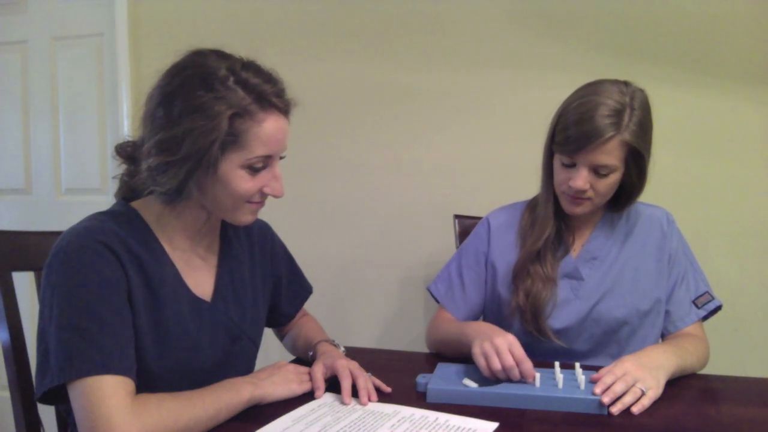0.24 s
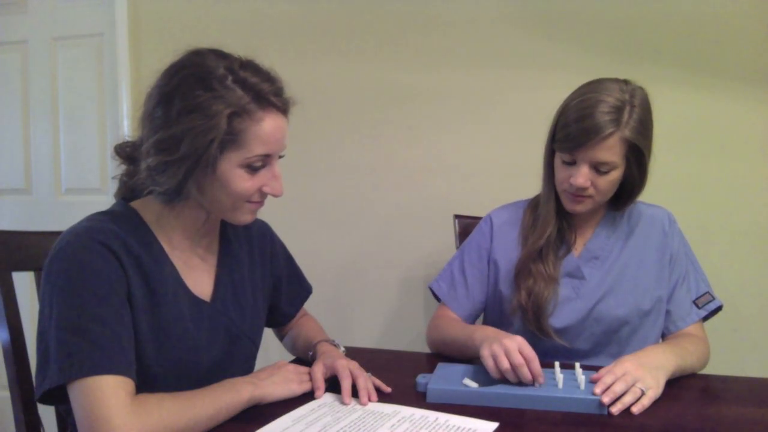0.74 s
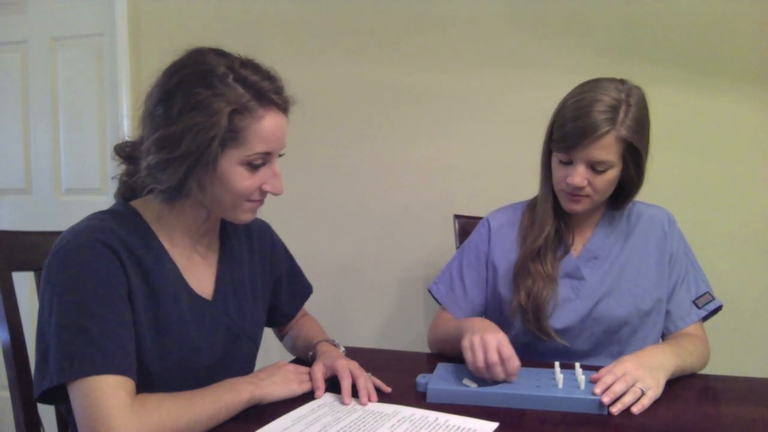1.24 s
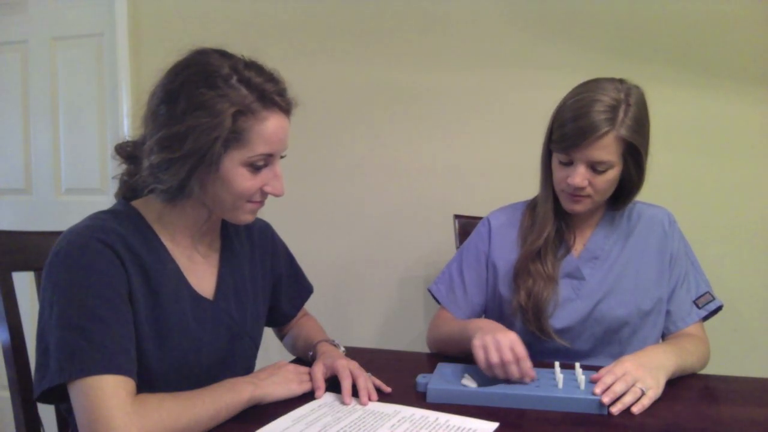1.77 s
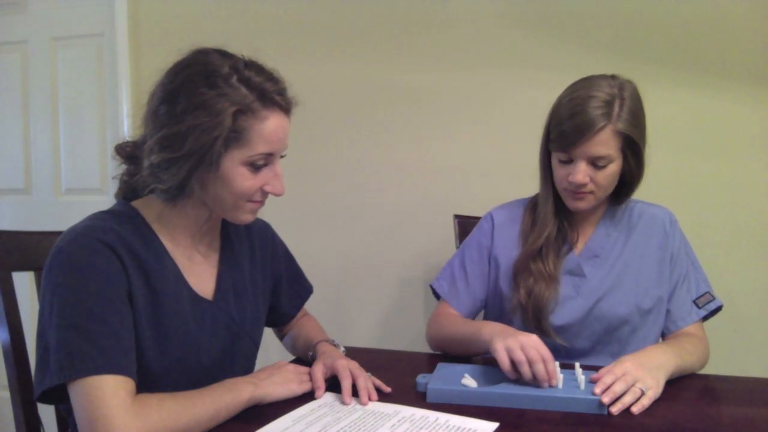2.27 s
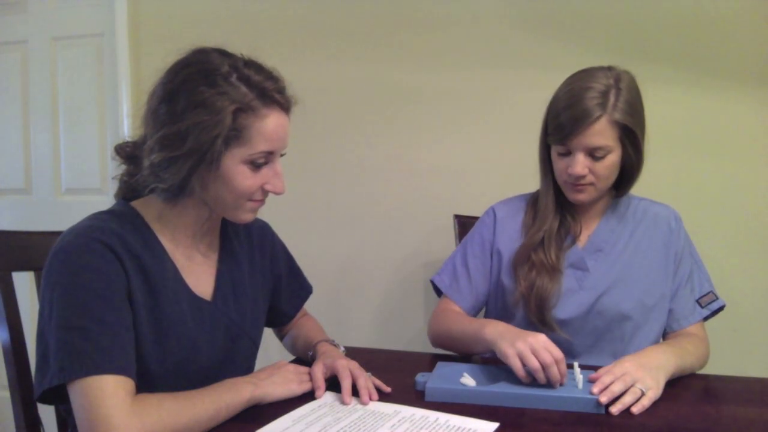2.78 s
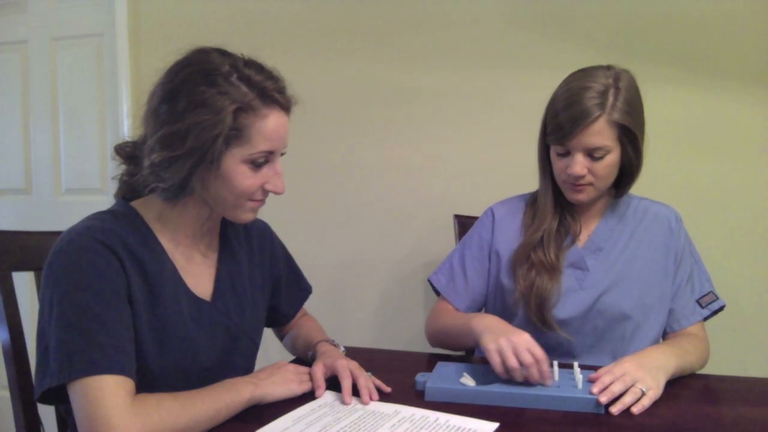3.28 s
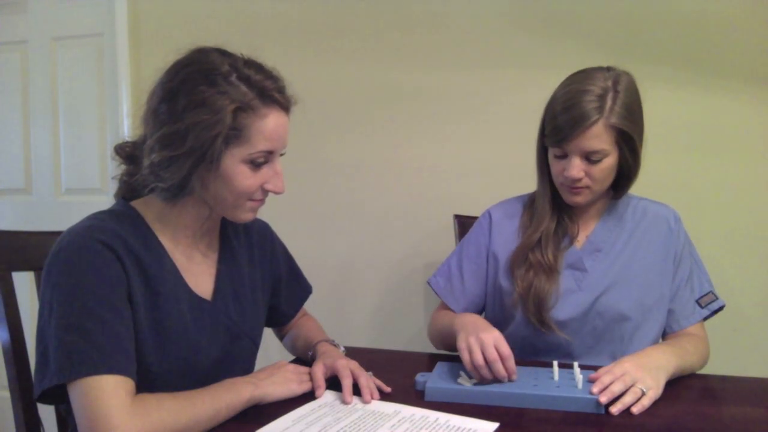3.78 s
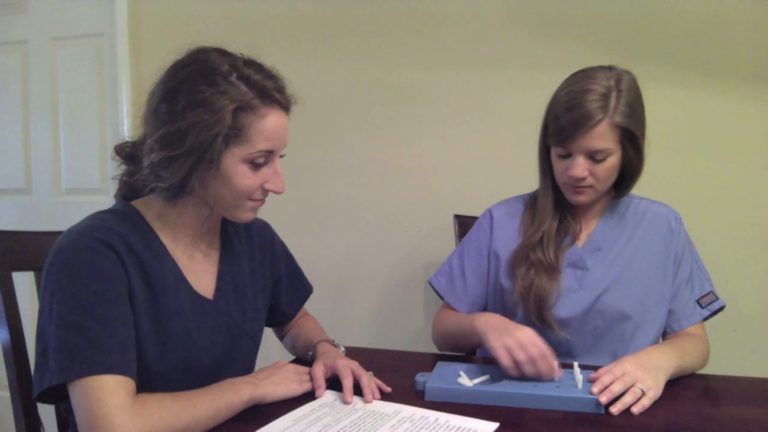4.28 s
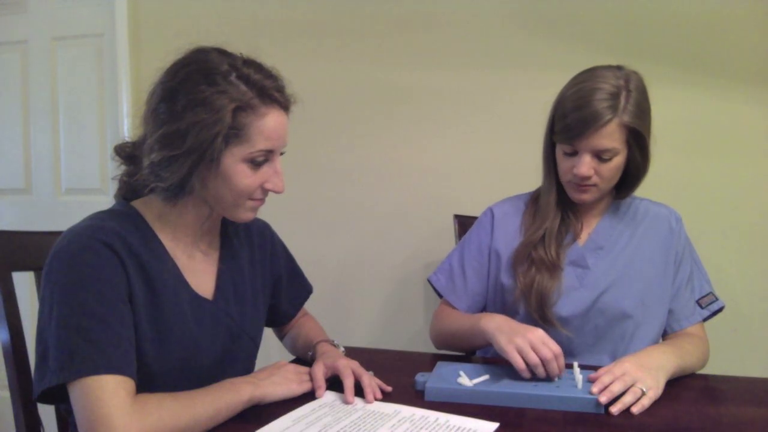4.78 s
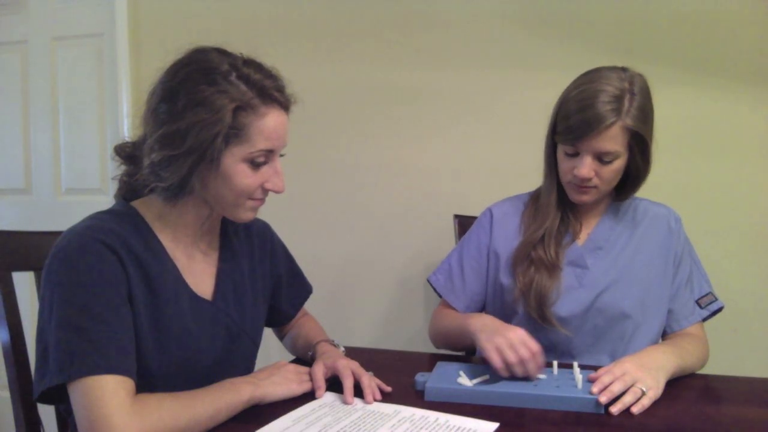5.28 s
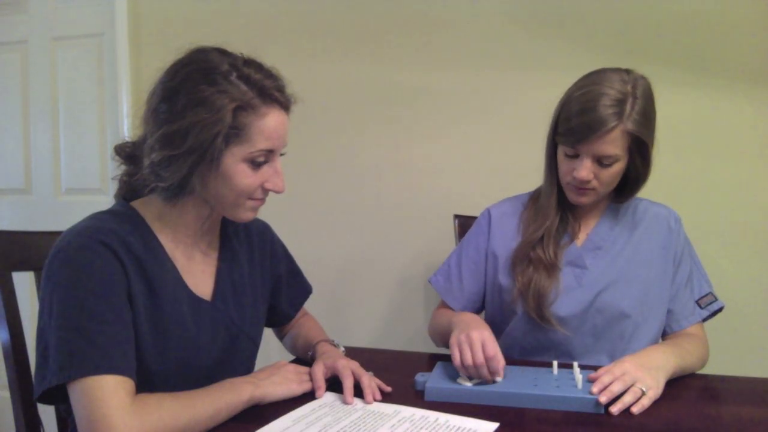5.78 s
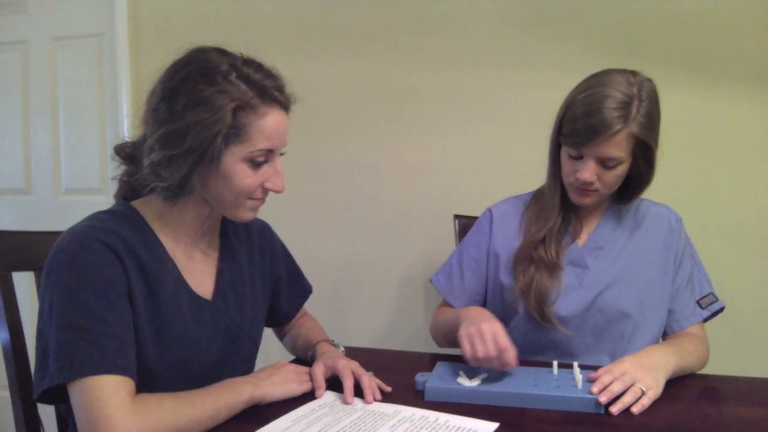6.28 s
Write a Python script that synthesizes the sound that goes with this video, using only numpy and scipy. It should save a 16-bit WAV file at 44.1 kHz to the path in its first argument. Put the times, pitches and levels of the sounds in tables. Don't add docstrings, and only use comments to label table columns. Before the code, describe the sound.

A bare indoor room with low hum and soft microphone hiss that swells with loud sounds and sinks in pauses. Faint touches and a muffled hand bump open the first half second. At 1.0 s a crisp plastic knock, then at 1.3 s a peg drops into the hollow tray, bouncing rapidly and brightly until about 1.6 s. Small clicks come at 1.9 s and 2.2-2.4 s, with tiny ticks and faint table pushes up to 3.3 s. At 3.5 s a second drop gives the fullest clatter, rolling for a quarter second and leaving a thin high tone. A soft low hand thud on the table falls at 4.1 s, followed by near quiet. From 5.2 to 5.5 s fingers rake pegs with clicks; a firm knock at 5.8 s. A softer, duller drop bounces at 6.1-6.3 s, then a faint thud at 6.4 s.

```python
import sys
import numpy as np
from scipy import signal
from scipy.fft import rfft, irfft
from scipy.io import wavfile
from scipy.ndimage import uniform_filter1d

SR = 44100
rng = np.random.default_rng(int(sys.argv[2]) if len(sys.argv) > 2 else 0)


def bounce(signal):
    frames = np.transpose(np.atleast_2d(signal))
    limited = np.clip(frames, -1, 1)
    pcm = np.round(limited * 32767).astype(np.int16)
    wavfile.write(sys.argv[1], SR, pcm)


def amplitude_ratio(level_db):
    exponent = np.asarray(level_db, float) / 20
    return 10 ** exponent


N = 287954

# frequency in Hz, density in dB per Hz.
HISS_SPECTRUM = [(25, -24), (60, -8.5), (80, -6), (100, -3), (170, -6), (315, 4), (480, -2.5), (630, 3),
                 (900, -4.5), (2300, -5.5), (2800, -14.5), (4400, -16.5), (4900, -22), (16000, -28)]
# time in seconds, peak in dB, pitch in Hz.
HAND_THUDS = [(0.252, -42, 308), (0.619, -77, 750), (0.748, -53, 590), (2.804, -51.5, 673),
              (2.855, -46, 692), (2.871, -53, 640), (4.107, -41, 292), (4.134, -31, 302.4),
              (4.168, -50, 350), (4.182, -44, 389), (4.209, -52, 303), (4.247, -50, 304), (4.287, -58, 312),
              (4.498, -46.5, 311), (6.443, -44, 371)]
# frequency in Hz, width in Hz, level in dB.
BOARD_MODES = [(384.4, 60, -1.5), (649, 39, -2), (735, 70, 6), (891, 60, -0.5), (1320, 70, -0.5),
               (1728, 49, -1), (2320, 30, -13), (2370, 210, -13.5), (2474, 130, -5), (2620, 200, -10),
               (3000, 360, 25), (3300, 53, -3), (3960, 49, -11.5), (3770, 157.4, -24), (4300, 140, -20),
               (4600, 30, -6)]
# frequency in Hz, density in dB per Hz.
CRACK_SPECTRUM = [(200, -56), (300, 1), (500, -22.5), (1000, -1.5), (1900, -7.5), (2600, 9.5), (3500, 12.5),
                  (4700, 1.5), (5000, -6), (7500, -14.5), (8800, -24.5), (9800, -13.5), (13500, -19),
                  (16000, -32)]
REGISTER_SPLITS_HZ = (1000, 2200, 4800, 8700)
# time in seconds, peak in dB, body weight in dB,
# tick in dB, fizz in dB.
BLOWS = [(.4454, -72, 7.5, -19, -23), (0.457, -52.5, 15.5, -27, -26), (0.5257, -36, -9, -19, -20),
         (.981, -17.5, -2.5, -3, -3), (1.1573, -39.5, 5, -43, -28), (1.8568, -33, -4.5, -3, -15),
         (1.867, -28, -17, -5, -12), (1.882, -41, 3.5, -8, -14), (2.2379, -30.5, -3, -19, -30),
         (2.3117, -45, 13.5, -28, -34.5), (2.6093, -49, 4.5, -10, -20), (2.9342, -49.5, 6, -20, -3),
         (3.1238, -44, -1, -36, -29), (3.2266, -51, 12, -22, -24), (3.492, -25.5, -5, -11.5, -19.5),
         (3.5142, -32.5, 1, -8, -17), (4.446, -47.5, 4.5, -27, -28), (5.231, -58, 3, -28.5, -38.5),
         (5.2648, -32, 4, -28, -41), (5.3245, -35, 8, -16, -30), (5.3572, -26, 1.5, -6.5, -26),
         (5.8139, -21, 0, -6, -37), (5.8373, -31.5, 5, -10, -24.5)]
# time in seconds, peak in dB, body weight in dB, tick in dB, fizz in dB.
BOUNCES = [(1.3112, -11, -3.5, -4.5, -8), (1.3453, -29.5, -12, 2.5, -30), (1.3654, -19, 1, -23, -11),
           (1.3951, -16, -11.5, -10.5, -15), (1.422, -22.5, 1.5, -34, -10), (1.4456, -14.5, -39, -6, -8.5),
           (1.476, -23, 0, -8.5, -6), (1.4934, -18, -19, -5, -7), (1.5322, -18, -42, -14, -26),
           (3.523, -13, 3, -8.5, -13), (3.5509, -15.5, -30.5, -6.5, -10.5), (3.5929, -13.5, -3, -1, -11),
           (3.6007, -19, -12.5, -24, -6), (3.6348, -14.5, -19, -13.5, -25), (3.6559, -17, -0.5, -23, -13),
           (3.6738, -14, -11, -7.5, -16), (3.702, -17, -5.5, -19.5, -9), (3.7092, -17.5, -27, -5.5, -24),
           (3.7347, -17, -4, -27.5, -12), (3.762, -23, -32.5, -4, -29), (6.0905, -34, -0.5, -32, -29),
           (6.1, -36.5, -12, 0, -31), (6.1477, -26, -22, -5, -16), (6.2108, -22.5, -4.5, -7.5, -17)]
# time in seconds, peak in dB, first
# tone in Hz, second tone in Hz.
TOUCHES = [(0.468, -42, 2090, 2630), (0.524, -34.5, 4390, 3700), (.545, -41, 2000, 2380),
           (0.939, -36, 2760, 2340), (1.097, -38, 2370, 4600), (1.157, -37, 2750, 3330),
           (1.181, -29.5, 865, 1200), (1.205, -32, 1000, 700), (1.23, -36.5, 1190, 880),
           (1.297, -44, 3700, 2530), (2.239, -32.5, 810, 4160), (2.248, -28.5, 1960, 2910),
           (2.262, -47, 2250, 4300), (2.315, -30, 800, 2960), (2.376, -35.5, 2800, 4210),
           (2.439, -42.5, 2790, 4480), (3.076, -41, 2550, 3300), (3.124, -36, 2130, 1490),
           (3.219, -34, 1680, 675), (3.233, -44, 2120, 3100), (3.491, -25, 3950, 4760),
           (4.537, -44, 2390, 3370), (5.193, -43, 3900, 2530), (5.222, -31, 1770, 4100),
           (5.245, -35, 735, 1850), (5.274, -26.5, 1820, 1310), (5.345, -50, 716, 420),
           (5.457, -32, 1460, 4570), (5.56, -36, 2380, 4600), (3.776, -23.5, 3350, 3000),
           (.527, -46.5, 5770, 9640), (1.853, -29, 2220, 4530), (2.243, -51, 8100, 10700),
          (3.285, -42, 680, 1488), (5.2, -35.5, 1710, 3300), (5.262, -46, 4040, 6060),
          (5.323, -58, 5960, 4500), (5.36, -44, 14000, 12800), (5.822, -45, 14600, 12500),
          (6.092, -31.5, 2580, 3600), (6.141, -41, 10300, 11500), (3.524, -26.5, 380, 1320),
          (.983, -31.5, 385, 1240), (1.19, -44, 373, 620), (5.3, -37, 1340, 725), (.526, -36.5, 2250, 3300),
          (4.538, -45, 1340, 4000)]
# start in seconds, strongest in seconds, end in seconds,
# strongest level in dB, body weight in dB.
RAKES = [
    (1.171, 1.189, 1.25, -64, 18),
    (5.189, 5.391, 5.49, -42, 7),
    (5.784, 5.823, 5.813, -43, -1),
]
# start in seconds, rolling from in seconds, end in seconds,
# rolling level in dB, brightness in dB.
DROPS = [
    (1.302, 1.341, 1.57, -34.5, -1.5),
    (3.523, 3.598, 3.79, -31, -3.5),
    (6.08, 6.091, 6.275, -37.5, -15.5),
]
# delay in seconds, level in dB.
WALL_ECHOES = [(.0021, -7), (.0047, -10), (.0083, -8), (.012, -5), (.017, -11), (.023, -11)]
# frequency in Hz, t60 in seconds.
WALL_T60 = [(250, 0.59), (660, 0.31), (1740, 0.37), (4590, 0.38), (8800, 0.34), (12100, 0.21)]

AIR_DB, AIR_START_DB, MURMUR_DB = -73.5, 9, 0
OPEN_SHARE, OPEN_MAX_DB, SINK_DB_PER_S = 0.34, 12.5, 13
BOOM_DB, ROLL_BODY_DB, SECOND_DB = -0.5, -3, -5.5
UPRIGHT_HZ, FLAT_HZ, TIP_SHARE, TIP_SPREAD = 2570, 3518, 0.59, 0.072
ROLL_FADE_DB, ROLL_DULL_DB, ROLL_THIN_DB = -4, -8.5, -6.5
RAKE_START_DB, RAKE_END_DB = -16.5, -16
RAKE_DULL_DB, RAKE_BRIGHT_DB, RAKE_HZ = -25, -16, 2620
LINGER_HZ, LINGER_T60_S, LINGER_DB = 3420, .3, -13
GATE_DB = -70


def evened(x):
    return x / np.sqrt(np.mean(x ** 2) + 1e-20)


def smoothed(x, size):
    return uniform_filter1d(uniform_filter1d(x, size), size)


def read(points, hz):
    f, value = np.transpose(points)
    return np.interp(np.log(hz + 1), np.log(f + 1), value)


def add(mix, s, sound):
    part = mix[round(s * SR):][:len(sound)]
    part += sound[:len(part)]


def ring(hz, t60, t):
    return amplitude_ratio(-60 * t / t60) * np.sin(2 * np.pi * hz * t)


def onset(t, rise_s):
    return np.sin(np.pi / 2 * np.minimum(t / rise_s, 1)) ** 2


def air(near):
    frames, hz = N // 256 + 5, np.fft.rfftfreq(1024, 1 / SR)
    real, imag, patches = rng.standard_normal((frames, 513, 3)).T
    patches_db = 1.0 * evened(uniform_filter1d(uniform_filter1d(patches, 8, 0), 12, 1))
    t = np.arange(frames) * 256 / SR
    near_db = 10 * np.log10(abs(uniform_filter1d(near ** 2, size=2048)) + 1e-12)
    excess_db = np.interp(t, np.arange(N) / SR, near_db) - AIR_DB
    push_db = np.clip(OPEN_SHARE * excess_db, 0, OPEN_MAX_DB)
    sink_db = SINK_DB_PER_S * t
    open_db = np.maximum.accumulate(np.maximum(push_db + sink_db, AIR_START_DB)) - sink_db
    low_mids = np.exp(-(np.log(hz + 1) - np.log(480)) ** 2 / .5)[:, None]
    reach = np.clip(1 - hz / 9000, .3, 1)[:, None]
    level_db = reach * (open_db - 6.5) + low_mids * (MURMUR_DB - 0.48 * open_db)
    z = (real + 1j * imag) * amplitude_ratio(read(HISS_SPECTRUM, hz)[:, None] + patches_db)
    steady = signal.istft(z, nperseg=1024, noverlap=768)[1]
    moving = signal.istft(z * amplitude_ratio(level_db), nperseg=1024, noverlap=768)[1][:N]
    return amplitude_ratio(AIR_DB + 9) * moving / np.sqrt(np.mean(steady ** 2))


def thuds():
    out, t = np.zeros(N), np.arange(3000) / SR
    for s, db, hz in HAND_THUDS:
        wood = ring(hz, 0.085, t) + .5 * ring(0.73 * hz, 0.026, t) + .25 * ring(2.3 * hz, 0.039, t)
        add(out, s, amplitude_ratio(db - 3.5) * wood * onset(t, 0.0028))
    return out


def registers(hz):
    borders_hz = np.array([1, *REGISTER_SPLITS_HZ, SR])[:, None]
    steepness = np.array([12, 12, 12, 20, 14, 12])[:, None]
    above = 1 / (1 + (borders_hz / (hz + 1)) ** steepness)
    return above[:-1] - above[1:]


def plastic(crack_db, crack_t60):
    t, hz = np.arange(2048) / SR, np.fft.rfftfreq(2048, 1 / SR)
    f, width, db = np.transpose(BOARD_MODES)[:, :, None]
    spot, detune = rng.standard_normal((2, len(BOARD_MODES), 1))
    t60 = np.minimum(2.2 / width, .03)
    modes = amplitude_ratio(db + 4 * spot) * ring(f * (1 + .015 * detune), t60, t)
    burst = rfft(rng.standard_normal(len(t)) * amplitude_ratio(-60 * t / crack_t60))
    even = burst / abs(burst) ** .65
    crack = irfft(even * amplitude_ratio(read(CRACK_SPECTRUM, hz)) * registers(hz)) * amplitude_ratio(-20 * t / crack_t60)
    both = evened(registers(f[:, 0]) @ modes) + amplitude_ratio(crack_db) * evened(crack)
    return np.array([evened(part) for part in both])


def peg_hz(s):
    done = max([(s - start) / (end - start) for start, _, end, _, _ in DROPS if s < end], default=-1)
    return UPRIGHT_HZ + (FLAT_HZ - UPRIGHT_HZ) / (1 + np.exp(min((TIP_SHARE - done) / TIP_SPREAD, 20)))


def knocks():
    out, t = np.zeros(N), np.arange(2048) / SR
    for s, db, body_db, tick_db, fizz_db in BLOWS + BOUNCES:
        fizz_db = min(fizz_db, 1.2 * (db + 12))
        weights = amplitude_ratio(np.array([body_db + BOOM_DB, body_db, 0, tick_db, fizz_db]))
        board = weights @ plastic(crack_db=5.0, crack_t60=0.032)
        peg = amplitude_ratio(-1.5) * evened(ring(peg_hz(s), 0.013, t))
        rise_s = .0004 * amplitude_ratio(-.5 * (db + 12))
        add(out, s, amplitude_ratio(db - 23.5) * onset(t, rise_s) * (board + peg))
    return out


def touches():
    out, t = np.zeros(N), np.arange(2048) / SR
    for s, db, hz, second_hz in TOUCHES:
        peg = ring(hz, .013, t) + amplitude_ratio(SECOND_DB) * ring(second_hz, .012, t)
        buzz = 1 + 0.13 * evened(smoothed(rng.standard_normal(len(t)), 30))
        rise_s = 0.002 * amplitude_ratio(-.35 * (db + 36.5))
        add(out, s, amplitude_ratio(db) * peg * buzz * onset(t, rise_s))
    return out


def rattle(start, db, boom_db, body_db, tick_db, hz, per_s, spread_db, fizz_db):
    out, t = np.zeros(N), np.arange(2048) / SR
    rise = np.minimum(np.arange(2048) / 40, 1) ** 2
    draws = rng.random((SR // 2, 16))[:len(db)].T
    size = amplitude_ratio(spread_db * np.minimum(-np.log(draws[:8] + 1e-9), 2.5))
    taps = size * (draws[8:] < per_s / 8 / SR)
    taps = taps * amplitude_ratio(db) / np.sqrt(np.mean(taps ** 2) * 8 + 1e-20)
    weights = amplitude_ratio(np.array([boom_db, body_db + 0 * db, 0 * db, tick_db, tick_db + fizz_db]))
    for train in taps:
        spot = plastic(crack_db=2.5, crack_t60=0.01)
        spot[2] += amplitude_ratio(-4) * evened(ring(rng.normal(hz, 66), 0.0057, t))
        sound = signal.fftconvolve(train * weights, rise * spot, axes=1).sum(0)
        add(out, start, amplitude_ratio(-38.0) * sound)
    return out


def rake(start, strongest, end, db, body_db):
    t, s = np.arange(start, end, 1 / SR), [start, strongest, end]
    press_db = np.interp(t, s, [RAKE_START_DB, 0, RAKE_END_DB])
    tick_db = np.interp(t, s, [RAKE_DULL_DB, RAKE_BRIGHT_DB, RAKE_BRIGHT_DB - 3.5])
    boom_db = body_db - 3.5 + .3 * press_db
    return rattle(start, db + press_db, boom_db, body_db, tick_db, RAKE_HZ,
                  per_s=600, spread_db=2.5, fizz_db=-20)


def roll(start, rolling, end, db, tick_db):
    done = np.arange(0, end - rolling, 1 / SR) / (end - rolling)
    level_db = db + ROLL_FADE_DB * done
    boom_db = ROLL_BODY_DB + ROLL_THIN_DB * done
    dulling_db = tick_db + ROLL_DULL_DB * done
    hz = peg_hz(rolling + .6 * (end - rolling))
    return rattle(rolling, level_db, boom_db, ROLL_BODY_DB, dulling_db, hz,
                  per_s=400, spread_db=4.0, fizz_db=-3.0 + 0.72 * (db + 30.5))


def linger():
    out, t = np.zeros(N), np.arange(SR // 3) / SR
    for _, _, end, db, _ in DROPS:
        tone = ring(LINGER_HZ, LINGER_T60_S, t) * np.minimum(t / 0.016, 1)
        add(out, end - .03, amplitude_ratio(db + LINGER_DB) * tone)
    return out


def room(x):
    early = np.zeros(2048)
    early[0] = 1
    for s, db in WALL_ECHOES:
        early[round(s * SR)] = amplitude_ratio(db)
    taps = np.zeros((3, SR // 2))
    at = np.arange(200, SR // 2 - 20, 12) + rng.integers(0, 12, (3, (SR // 2 - 209) // 12))
    np.put_along_axis(taps, at, rng.choice([-1., 1.], at.shape), 1)
    hz, t, z = signal.stft(taps, SR, nperseg=256)
    decay_db = -52 * t * (1 + t / 0.29) / read(WALL_T60, hz)[:, None]
    tails = signal.istft(z * amplitude_ratio(decay_db), SR, nperseg=256)[1]
    phase = 6.6 * np.arange(N) / SR + np.arange(3)[:, None] / 3
    turn = np.cos(np.pi * phase) * np.sqrt(2 / 3)
    late = signal.fftconvolve(x * turn, tails / np.linalg.norm(tails[0]), axes=1).sum(0)
    return signal.fftconvolve(x, early)[:N] + amplitude_ratio(-1.5) * late[:N]


def gated(x):
    hz, _, z = signal.stft(x, SR, nperseg=256, noverlap=192)
    power = uniform_filter1d(uniform_filter1d(abs(z) ** 2, size=3, axis=0), size=5, axis=1)
    floor = amplitude_ratio(2 * (GATE_DB + read(HISS_SPECTRUM, hz)))[:, None]
    keep = power / (abs(power) + floor)
    return signal.istft(z * keep, SR, nperseg=256, noverlap=192)[1][:N]


def scene():
    rattles = sum(rake(*row) for row in RAKES) + sum(roll(*row) for row in DROPS)
    no_bass = signal.butter(6, 285, "high", fs=SR, output="sos")
    close = signal.sosfilt(no_bass, thuds() + knocks() + touches() + rattles)
    near = gated(room(close + linger()))
    return (near + air(near))[None]


def low_pass(x):
    return signal.sosfilt(signal.butter(12, 16500, fs=SR, output="sos"), x)


def record(dry):
    thin = signal.sosfilt(signal.butter(1, 45, "high", fs=SR, output="sos"), dry)
    limited = signal.oaconvolve(thin, signal.firwin(255, 16300, fs=SR)[None], "same")
    return low_pass(limited)


dry = scene()
out = record(dry)
bounce(out)
```